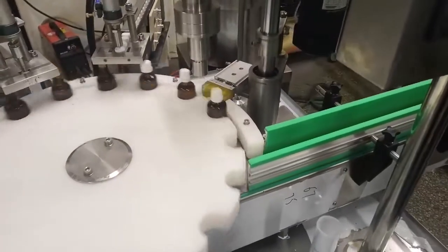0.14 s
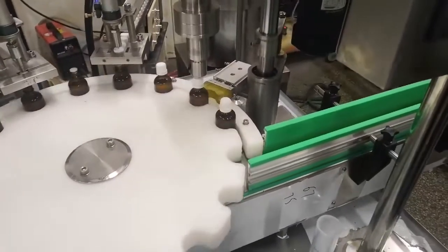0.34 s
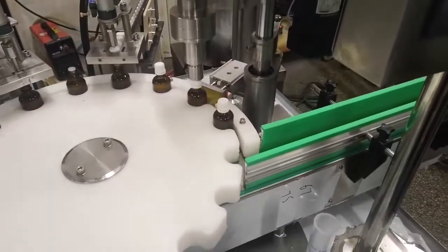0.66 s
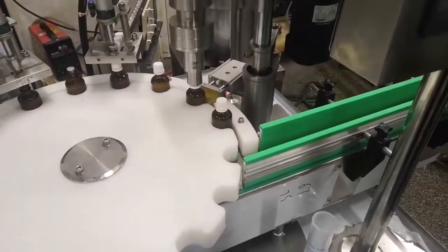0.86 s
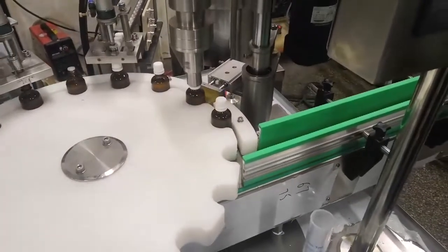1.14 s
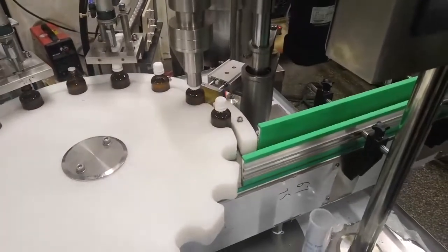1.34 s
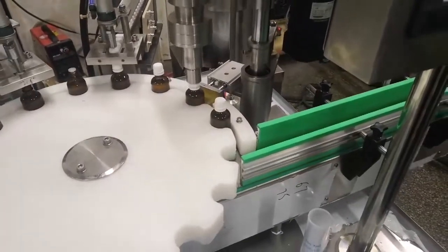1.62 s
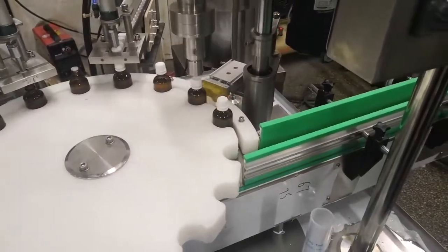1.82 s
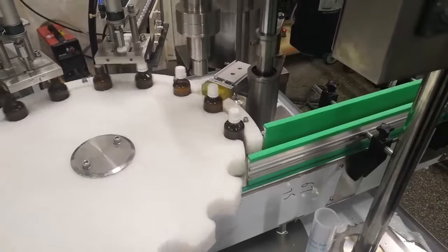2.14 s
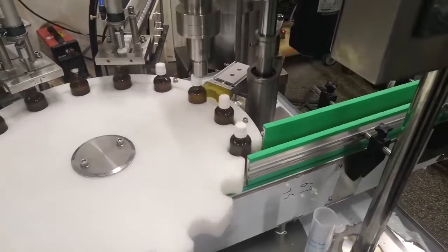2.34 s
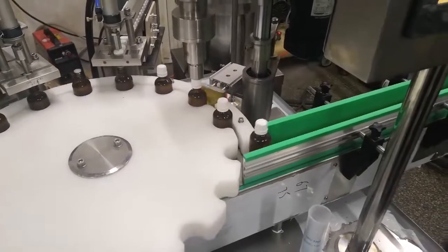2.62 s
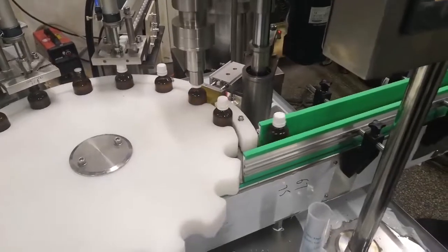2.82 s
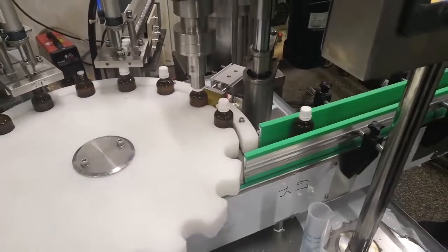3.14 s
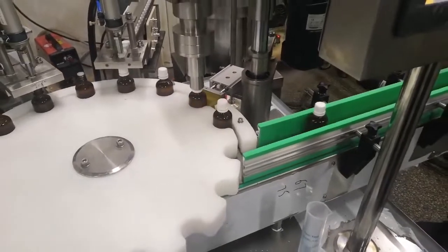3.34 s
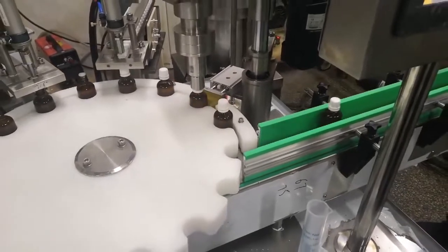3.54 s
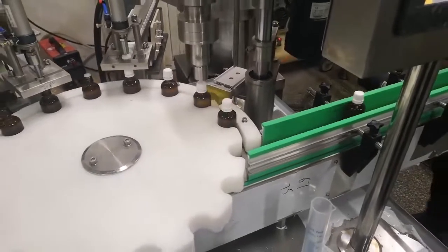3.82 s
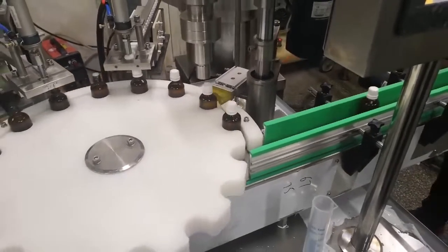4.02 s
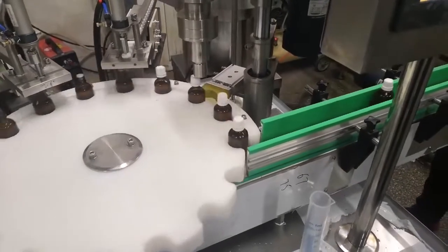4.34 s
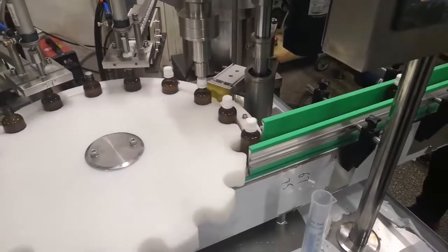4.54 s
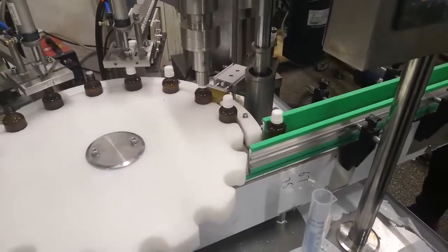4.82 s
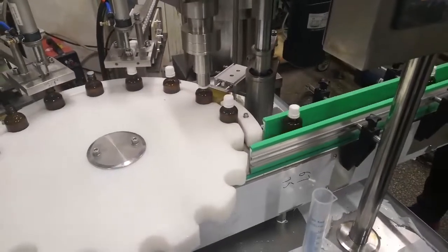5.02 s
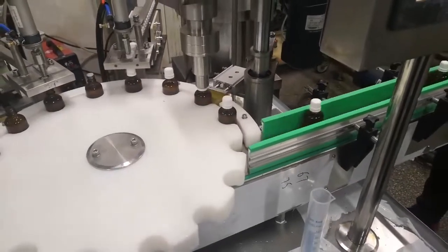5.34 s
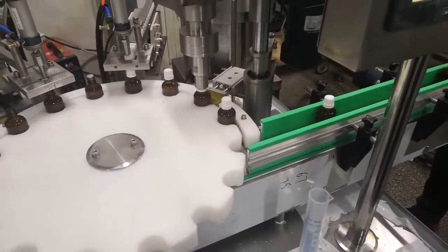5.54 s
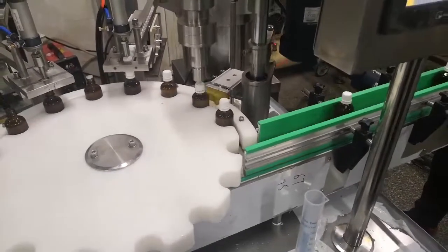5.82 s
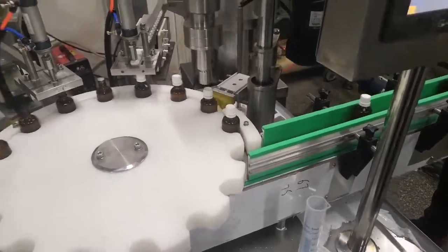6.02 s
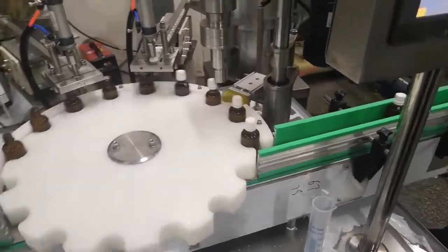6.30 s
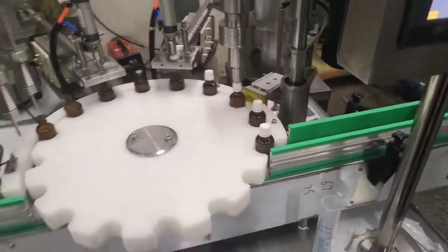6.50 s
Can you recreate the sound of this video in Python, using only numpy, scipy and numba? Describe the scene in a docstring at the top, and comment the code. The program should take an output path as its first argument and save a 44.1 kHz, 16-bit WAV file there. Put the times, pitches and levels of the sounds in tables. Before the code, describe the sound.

A rotary bottling machine hums, scrapes and rattles steadily, with sharp double air spits every two seconds, each followed by a metallic capping knock.

```python
"""A humming feeder and caps rattling in a ringing steel bowl are heard first, with conveyor scrape and air hiss.
About every two seconds the bottling machine spits air from two valves, then its capping head lands and spins.
Steady parts are filtered noise, dense impacts and wavering sines; blows and clicks are decaying noise or modes.
A gain control ducks under loud air and clicks; short delays then widen the single channel to two."""
import sys
import numpy as np
from scipy import signal
from scipy.fft import rfft, irfft
from scipy.io import wavfile
from scipy.ndimage import uniform_filter1d
from numba import njit

SR = 44100
rng = np.random.default_rng(int(sys.argv[2]) if len(sys.argv) > 2 else 0)


def to_wav(sig):
    """Store sig (one row per channel, or 1-D mono) as 16-bit WAV at the path in sys.argv[1].

    Samples outside -1..1 are clipped; the rate is SR.
    """
    pcm = np.clip(np.atleast_2d(sig), -1, 1) * 32767
    pcm = np.round(pcm).astype(np.int16)
    wavfile.write(sys.argv[1], SR, pcm.T)  # frames by channels


N = 294147
T = np.arange(N) / SR
FREQS = np.fft.rfftfreq(N, 1 / SR)
# Throughout, t60 is the time to fall by 60 dB, and levels are those before the gain control.


def undb(db):
    """Logarithmic level: decibels become an amplitude gain."""
    return 10 ** (np.asarray(db) / 20)


def level(x, db):
    """Root-mean-square amplitude: scale a sound to this level."""
    return x * undb(db) / np.sqrt(np.mean(x ** 2))


def colour(x, points):
    """Linear filtering: the gain in dB is interpolated over log frequency between (f/Hz, gain/dB) points."""
    hz, db = np.transpose(points)
    gain_db = np.interp(np.log(FREQS + 1), np.log(hz), db)
    return irfft(rfft(x) * undb(gain_db), N)


def noise(points):
    """Spectral shaping: white noise is coloured and brought to unit rms."""
    return level(colour(rng.standard_normal(N), points), 0)


def walk(rate):
    """Low-pass fluctuation: smooth random drift of unit spread, fading above about this rate in Hz."""
    hz = FREQS[:N // 100]
    spectrum = rfft(rng.standard_normal(2 * len(hz) - 1))
    drift = irfft(spectrum * np.exp(-(hz / rate) ** 2))
    return np.interp(T, np.linspace(0, T[-1], len(drift)), drift / drift.std())


def curves(table):
    """Linear interpolation: each column after t/s becomes a curve, sample by sample."""
    s, *columns = np.transpose(table)
    return [np.interp(T, s, column) for column in columns]


def swell(middle, length):
    """Gaussian envelope: a smooth rise and fall, at half gain or more for this length."""
    return .5 ** ((2 * (T - middle) / length) ** 2)


def swells(table):
    """Superposition: the changes in dB of all listed swells are added."""
    return sum(db * swell(s, length) for s, length, db in table)


def held(middle, length):
    """Flat-topped envelope: a rub builds up, holds and lets go, at half gain or more for this length."""
    return .5 ** ((2 * (T - middle) / length) ** 4)


def decay(start, t60, rise):
    """Exponential damping: the envelope of a blow with a short rise."""
    age = np.maximum(T - start, 0)
    return (1 - np.exp(-age / rise)) * np.exp(-np.log(1000) * age / t60)


def strike(s, modes, rise):
    """Modal ringing: one contact excites damped sines, given as (f/Hz, level/dB, t60/s)."""
    t = T[:SR // 4]
    ring = 0
    for hz, db, t60 in modes:
        ring = ring + undb(db) * np.sin(2 * np.pi * hz * t) * np.exp(-np.log(1000) * t / t60)
    return np.pad(ring * (1 - np.exp(-t / rise)), (int(s * SR), N))[:N]


def blows(table, points, rise):
    """High modal density: soft blows on a steel part shake so many close modes that noise stands for them."""
    return noise(points) * sum(undb(db) * decay(s, t60, rise) for s, db, t60 in table)


def impacts(per_s, scatter_db):
    """Shot noise: a dense stream of tiny random impacts of uneven size."""
    hits = rng.random(N) < per_s / SR
    sizes = rng.standard_normal(N) * undb(scatter_db * rng.standard_normal(N))
    return hits * sizes


def panels(x, t60, wet_db):
    """Diffuse reverberation: dense reflections between the machine's steel panels."""
    t = T[:SR // 2]
    tail = rng.standard_normal(len(t)) * np.exp(-np.log(1000) * t / t60)
    return x + undb(wet_db) * signal.fftconvolve(x, tail / np.linalg.norm(tail))[:N]


def shifting(x, depth_db, frames_size, bins_size):
    """Time-varying filtering: random smooth gains over time and pitch make the colour flicker."""
    cells = signal.stft(x, nperseg=1024)[2]
    drift = rng.standard_normal(cells.shape)
    for _ in range(2):
        drift = uniform_filter1d(drift, frames_size, axis=1)
        drift = uniform_filter1d(drift, bins_size, axis=0)
    gain = undb(depth_db * drift / drift.std())
    return level(signal.istft(cells * gain)[1][:N], 0) * x.std()


# motor lines: (f/Hz, relative level/dB, waver/dB)
MOTOR_LINES = [(49, -16.5, 3), (148.5, -20, 3), (192, -17, 3.5), (250.1, -1.4, 1), (307.3, -11.5, 2.5)]
# level of the whole hum: (t/s, level/dB)
HUM_LEVEL = [(0, -38.5), (1.2, -37.5), (3.6, -37.5), (4, -39.5), (5.25, -39.5), (5.75, -37)]
# level of the feeder magnet's line against the rest of the hum: (t/s, relative level/dB)
MAGNET_LEVEL = [(0, 0.5), (.5, -3.5), (.62, -5), (1.25, -8), (2.1, -7), (2.3, -8.5), (3.2, -13), (3.35, -4),
                (3.8, -8.5), (4.05, -3), (4.3, -4.5), (4.75, -6.5), (5.2, -7.5), (5.5, -5), (5.9, -10),
                (6.6, -5.5)]
# spectrum of the frame's rumble: (f/Hz, relative density/dB)
RUMBLE_SPECTRUM = [(20, -5.5), (55, -14), (85, 2.5), (175, 3), (270, 12), (480, -6), (800, -41.5),
                   (9000, -87)]
MAGNET_HZ = 100.1  # twice the mains frequency


def hum():
    """Forced vibration: magnet and motors drive wavering lines over the frame's broadband rumble."""
    lines = 0
    for hz, line_db, waver in MOTOR_LINES:
        strength = undb(line_db + waver * walk(4.2))
        lines = lines + strength * np.sin(2 * np.pi * hz * T + 0.15 * waver * walk(4.6))
    magnet_db, = curves(MAGNET_LEVEL)
    magnet_phase = 2 * np.pi * MAGNET_HZ * T + .4 * walk(6.5)
    magnet = undb(magnet_db + 2.1 * walk(6.4)) * np.sin(magnet_phase)
    rumble = noise(RUMBLE_SPECTRUM) * undb(-4.0 + walk(6.0))
    load_db, = curves(HUM_LEVEL)
    return (np.sqrt(2) * (lines + magnet) + rumble) * undb(load_db)


# spectrum of the steady hiss: (f/Hz, relative density/dB)
HISS_SPECTRUM = [(2500, -12.5), (5200, 0), (5900, 2), (6450, 4), (6800, 9), (8750, 8), (9050, -7.5),
                 (9400, -76)]
# the hiss grows for a moment: (middle t/s, length/s, change/dB)
HISS_SWELLS = [(.58, 0.053, 3.2), (1.74, 0.086, 2.3), (2.59, 0.081, 1.4), (4.47, 0.083, 1.7),
               (5.7, 0.31, 2)]
# spectrum of the bright swells: (f/Hz, relative density/dB)
BRIGHT_SPECTRUM = [(4500, -35.5), (6800, -5), (8800, 5), (9600, -9), (10200, -51)]
# short swells of bright noise reaching above 9 kHz: (middle t/s, length/s, level/dB)
BRIGHT_SWELLS = [(.14, 0.07, -42), (.3, 0.041, -37), (0.556, 0.032, -30), (1.33, 0.049, -37),
                 (2.636, 0.061, -40.5), (5.437, .05, -40.5), (5.546, .05, -38), (5.93, .05, -36.5),
                 (6.607, 0.044, -38)]


def air_line():
    """Turbulent jet noise: leaking compressed air gives a steady hiss. Apart from it, short swells of bright
    noise now and then reach above 9 kHz."""
    hiss = shifting(noise(HISS_SPECTRUM), depth_db=5.5, frames_size=5, bins_size=1)
    hiss_db = -30.5 + swells(HISS_SWELLS) + .5 * walk(25)
    envelope = sum(undb(db) * swell(s, length) for s, length, db in BRIGHT_SWELLS)
    return hiss * undb(hiss_db) + noise(BRIGHT_SPECTRUM) * envelope


# spectrum of the scrape's slips: (f/Hz, relative gain/dB)
SCRAPE_SPECTRUM = [(200, -47), (400, -7.5), (800, -5), (950, 2), (1250, 1.5), (1620, 1.5), (1820, -10.5),
                   (2300, -3.5), (5000, -51), (9000, -80)]
CONVEYOR_DB, START_DB, SETTLE_S = -31.5, -2, 0.48  # the scrape starts softer and settles


def conveyor(change_db):
    """Stick-slip friction: chain links scrape along their guides in countless small slips."""
    slips = colour(impacts(per_s=12000, scatter_db=2.0), SCRAPE_SPECTRUM)
    scrape = shifting(panels(slips, t60=0.21, wet_db=-5.5), depth_db=3.0, frames_size=6, bins_size=1)
    db = CONVEYOR_DB + START_DB * np.exp(-(T / SETTLE_S) ** 2) + change_db
    return level(scrape, -1.95) * undb(db)


# spectrum of the cap rattle: (f/Hz, relative gain/dB)
RATTLE_SPECTRUM = [(900, -19), (1700, -7), (2150, 3), (2500, -2), (3250, -1), (3480, -0.5), (4400, 0),
                   (4750, -5), (5250, -1.5), (5500, -53), (9000, -75)]
# drive of the rattle: (t/s, level/dB)
RATTLE_LEVEL = [(0, -28), (1.4, -28.5), (3.2, -29), (3.9, -27.5), (4.6, -29), (5.3, -28.5), (6.6, -28)]
# modes of the steel bowl and track: (f/Hz, bandwidth/Hz, rms level before the trim/dB)
BOWL_MODES = [(1039, 8, -51), (1141, 6, -46.5), (1266, 5, -46.5), (1625, 22, -48), (1674, 12, -49),
              (2148, 12, -43.5), (2210, 22, -47.5), (2290, 14, -49), (2440, 20, -49), (3010, 22, -49),
              (3385, 12, -52), (3655, 10, -47), (4112, 10, -43), (4370, 10, -50), (4497, 10, -51),
              (4965, 10, -50), (6748, 24, -46), (7565, 18, -50), (7963, 6, -46), (8630, 30, -48)]
BOWL_TRIM_DB, BOWL_SWELL_DB = -5, 5.5  # trim of all modes; spread of each one's own swelling
RATTLE_SHARE = 0.68  # dB of rattle change per dB of scrape change


def feeder(change_db):
    """Resonance: caps chatter on the vibrating track and keep the bowl's modes ringing, each with its own swell."""
    caps_db, = curves(RATTLE_LEVEL)
    drive_gain = undb(caps_db + RATTLE_SHARE * change_db)
    chatter = impacts(per_s=10000, scatter_db=1.0) * undb(0.36 * walk(23))
    caps = panels(colour(chatter, RATTLE_SPECTRUM), t60=0.24, wet_db=-4.5)
    caps = level(caps, -0.26) * drive_gain
    drive, bowl = rfft(chatter * drive_gain), 0
    for hz, width, mode_db in BOWL_MODES:
        resonance = 1j * FREQS * width / (hz ** 2 - FREQS ** 2 + 1j * FREQS * width)
        ring = irfft(drive * resonance, N) * undb(BOWL_SWELL_DB * walk(6.5))
        bowl = bowl + level(ring, mode_db + BOWL_TRIM_DB)
    return shifting(caps, depth_db=4.5, frames_size=5, bins_size=1) + bowl


# the bowl's least damped modes: (f/Hz, phase wander/rad)
SINGING_MODES = [(3106, 1.4), (3268, .35), (3618, 1.1), (4016, .6), (5060, 1.2), (5222, .8), (8577, 1.2)]
# resting strength of each singing mode: relative level/dB
SINGING_REST_DB = [-45.5, -40, -43.5, -43, -43, -42.5, -44]
# caps rub the rim, each swelling one mode: (middle t/s, length/s, mode f/Hz, relative level/dB)
RUBS = [(0.614, .11, 3268, -36), (1.6, 0.11, 3106, -36), (1.727, 0.15, 5060, -33), (1.75, 0.12, 8577, -28),
        (1.82, .3, 5222, -38), (2.147, 0.097, 5222, -29.5), (2.504, 0.081, 3618, -30),
        (2.6, .14, 5222, -30.5), (3.495, .33, 5222, -31.5), (3.797, 0.18, 3268, -31.5),
        (4.024, 0.16, 3268, -24), (4.49, 0.17, 3106, -33), (4.5, 0.15, 5060, -33),
        (4.514, 0.3, 5222, -30.5), (4.558, 0.1, 3268, -27.5), (5.726, 0.068, 3268, -32.5)]


def singing_bowl():
    """Friction-excited modes: lightly damped tones waver in phase and strength and swell when caps rub the rim."""
    pitches = np.array(SINGING_MODES)[:, 0]
    power = [undb(db) ** 2 for db in SINGING_REST_DB]
    for s, length, hz, db in RUBS:
        k = np.argmin(abs(pitches - hz))
        power[k] = power[k] + (undb(db) * held(s, length)) ** 2
    out = 0
    for (hz, wander), mode_power in zip(SINGING_MODES, power):
        phase = 2 * np.pi * hz * T + wander * walk(19)
        tone = level(np.sin(phase) * undb(3.2 * walk(15)), -1.3)
        out = out + tone * np.sqrt(mode_power)
    return out


# dull bumps of the stops: (t/s, peak level/dB)
THUDS = [(.776, -19.5), (2.776, -26), (3.0955, -21), (4.777, -16)]


def thuds():
    """Impulsive pressure: each stop gives one dull push."""
    return sum(undb(db) * swell(s, .0028) for s, db in THUDS)


# bottles and stops clicking: (t/s, then the level/dB of each of the four click modes)
CLICKS = [(.7622, -30, -22, -9, -8), (.9193, -6, 2, 4.5, 8), (2.7608, -24, -16, -3, -2),
          (2.7758, -22, -12, -7, -5), (3.0931, -24, -8, 3, 10.5), (4.7985, -12, -6, -5, -6),
          (5.0835, -11, -8, 3.5, 6), (5.3728, -26, -16, -14, -10)]
# what a click rings with: (f/Hz, t60/s)
CLICK_MODES = [(2900, .006), (5050, .003), (8400, .0032), (13000, .008)]


def clicks():
    """Stiff contact: glass and steel meet very briefly, each time with its own balance of modes."""
    out = 0
    for s, *levels in CLICKS:
        modes = [(hz, db, t60) for (hz, t60), db in zip(CLICK_MODES, levels)]
        out = out + strike(s, modes, rise=.0003)
    return out


# spectrum of the spindle: (f/Hz, relative density/dB)
SPINDLE_SPECTRUM = [(60, -36.5), (88, 3), (102, 13.5), (120, -8.5), (190, -5), (300, -40.5)]
# the spindle screws a cap down: (middle t/s, length/s, level/dB)
SPINS = [(1.42, 0.4, -46), (3.54, 0.52, -41), (5.526, 0.48, -45)]


def spindle():
    """Rotational noise: the capping spindle drones for a moment after each landing."""
    return noise(SPINDLE_SPECTRUM) * sum(undb(db) * swell(s, length) for s, length, db in SPINS)


# machine cycles, shared with the knocks: (t/s, valve level/dB, exhaust/s, knock level/dB, knock t60/s)
CYCLES = [(0.754, -15, 0.15, -25.5, 0.33), (2.756, -16, 0.14, -26, 0.41), (4.757, -15.5, 0.23, -21.5, 0.24)]
# the two valves of a cycle: (delay/s, spit relative level/dB, chuff relative level/dB, chuff t60/s,
# chuff rise/s, jet level/dB, share of the exhaust length)
VALVE_PAIR = [(0, -1, 3, 0.16, 0.015, -7, 0.02), (0.036, -7.5, -2.5, 0.25, 0.0057, -10.5, 1)]
# spectrum of spit and chuff: (f/Hz, relative density/dB)
CHUFF_SPECTRUM = [(200, 9), (700, 6), (1500, 13.5), (2500, 11), (3400, 1), (4700, 15), (5900, 10),
                  (7000, 12), (8500, 18), (9500, 7.5), (12000, -43)]
# spectrum of the vented jet: (f/Hz, relative density/dB)
JET_SPECTRUM = [(2000, -36), (9000, -21.5), (10500, -73), (13000, 1), (18000, 16)]


def valves():
    """Transient jet noise: a valve opens with a sharp spit and a chuff, and vents a jet strongest in high treble."""
    chuff, jet = 0, 0
    for start, cycle_db, exhaust, *_ in CYCLES:
        for delay, spit_db, chuff_db, t60, rise, jet_db, share in VALVE_PAIR:
            s = start + delay
            spit = undb(spit_db) * decay(s + .003, t60=.03, rise=.001)
            chuff = chuff + undb(cycle_db) * (spit + undb(chuff_db) * decay(s, t60, rise))
            # the jet builds up quickly and dies away as the cylinder empties
            opening = np.clip((T - s) / 0.00081, 0, 1)
            emptying = np.clip(1 - (T - s - share * exhaust) / 0.053, 0, 1)
            jet = jet + undb(jet_db) * opening * emptying
    return noise(CHUFF_SPECTRUM) * chuff + noise(JET_SPECTRUM) * jet


# what the capping column rings with: (f/Hz, relative level/dB, t60/s)
COLUMN_MODES = [(958, -9, .15), (1071, -8, .2), (1297, -2, .14), (1373, 0, .07), (1599, -5, .13),
                (2191, -9, .07)]
# spectrum of the knock: (f/Hz, relative density/dB)
KNOCK_SPECTRUM = [(300, -1.5), (700, -5), (900, 9), (1500, 6.5), (2200, 5), (4000, -38)]
# spectrum of the frame's judder: (f/Hz, relative density/dB)
JUDDER_SPECTRUM = [(30, -23), (90, -6.5), (300, 3.5), (500, -19), (1500, -52)]
# the frame judders: (t/s, level/dB, t60/s)
JUDDERS = [(1.6, -30, .28), (3.622, -21, 0.17), (5.645, -28.5, 0.23)]
KNOCK_DELAY_S, KNOCK_RISE_S = .542, .004  # the delay runs from the start of the cycle
REBOUND_S, REBOUND_DB = 0.042, -6
COLUMN_DELAY_S, COLUMN_DB = .003, -1  # relative to the landing


def knocks():
    """Impact and rebound: the capping head lands, rings its column and bounces once; the frame judders lower."""
    landings = [(s + KNOCK_DELAY_S, db, t60) for s, *_, db, t60 in CYCLES]
    rebounds = [(s + REBOUND_S, db + REBOUND_DB, t60) for s, db, t60 in landings]
    column = 0
    for s, db, _ in landings:
        column = column + undb(db + COLUMN_DB) * strike(s + COLUMN_DELAY_S, COLUMN_MODES, KNOCK_RISE_S)
    head = blows(landings + rebounds, KNOCK_SPECTRUM, KNOCK_RISE_S)
    return column + head + blows(JUDDERS, JUDDER_SPECTRUM, rise=0.008)


# the scrape and rattle grow louder or softer for a moment: (middle t/s, length/s, change of scrape/dB)
SCRAPE_CHANGES = [(1.14, 0.19, 0), (2.52, 0.3, 1.5), (3.055, .06, 1), (3.24, .12, -0.5), (4.53, 0.22, 2.5),
                  (5.23, 0.21, -1.5)]


def scene():
    """Superposition: all parts of the machine add at one microphone, given as two equal channels."""
    change_db = swells(SCRAPE_CHANGES)
    steady = hum() + air_line() + conveyor(change_db) + feeder(change_db) + singing_bowl()
    near = steady + thuds() + clicks() + spindle() + valves() + knocks()
    return np.array([near, near])


@njit
def follow(power, attack, release):
    """Exponential averaging: an envelope follower with separate rates for rise and fall."""
    out, e = np.empty(len(power)), 0.
    for i in range(len(power)):
        e += (power[i] - e) * (attack if power[i] > e else release)
        out[i] = e
    return out


def gain_control(x, top_db, window_s, attack_s, release_s, lag_s):
    """Dynamic compression: a fast limiter and a slow gain rider, both a moment late."""
    fast = follow(np.mean(x ** 2, axis=0), 1 / (window_s * SR), 1 / (window_s * SR))
    slow = follow(fast, 1 / (attack_s * SR), 1 / (release_s * SR))
    gain = np.minimum(1, undb(top_db) / np.sqrt(np.maximum(fast, slow) + 1e-12))
    return x * np.interp(T - lag_s, T, gain)


# side channel, inverted late copy: (f/Hz, gain/dB)
LATE_COPY = [(300, -33), (1500, -15.5), (2800, -11.5), (4200, -6), (6500, -1.5), (9000, -4)]
# side channel, spray of short delays: (f/Hz, gain/dB)
SPRAY = [(90, -45), (280, -14.5), (480, -1.5), (1100, -3.5), (2300, -3.5), (4200, -4.5), (6500, -16),
         (9000, -6.5)]
# side channel, a little direct sound: (f/Hz, gain/dB)
LEAN = [(300, -39), (3000, -35), (4500, -14), (6500, -7), (8500, -14.5)]
LATE_S, SPRAY_FROM_S, SPRAY_TO_S = .0202, .010, .029


def widen(mid):
    """Decorrelation: delayed copies of the sound are added on the left and subtracted on the right."""
    late = np.pad(mid, (int(LATE_S * SR), 0))[:N]
    taps = rng.standard_normal(int(SPRAY_TO_S * SR))
    taps = taps * (T[:len(taps)] > SPRAY_FROM_S)
    # every pitch gets its own delay but keeps its strength
    spray = irfft(rfft(mid) * np.exp(1j * np.angle(rfft(taps, N))), N)
    side = colour(spray, SPRAY) - colour(late, LATE_COPY) + colour(mid, LEAN)
    return np.array([mid + side, mid - side])


def record(dry):
    """Signal chain: the recorder ducks on loud air and clicks, widens the sound, then cuts above 9750 Hz."""
    ducked = gain_control(dry, top_db=-13.0, window_s=.003, attack_s=0.0019, release_s=0.087, lag_s=.0012)
    low_pass = signal.ellip(12, .2, 95, 9750, fs=SR, output="sos")
    return signal.sosfilt(low_pass, widen(ducked.mean(axis=0)))


dry = scene()
out = record(dry)
to_wav(out)
```